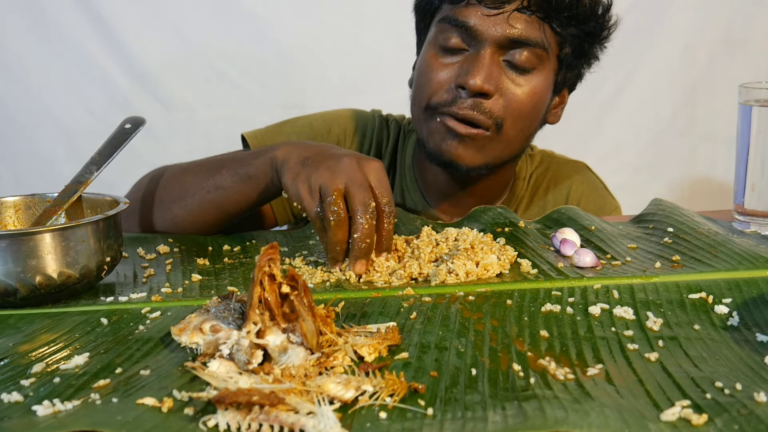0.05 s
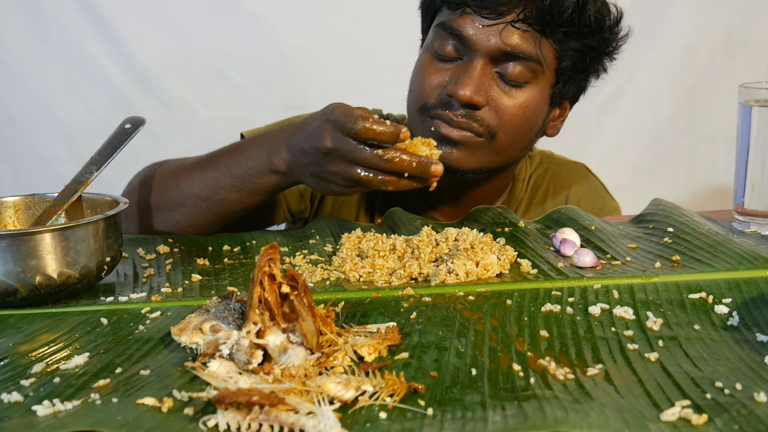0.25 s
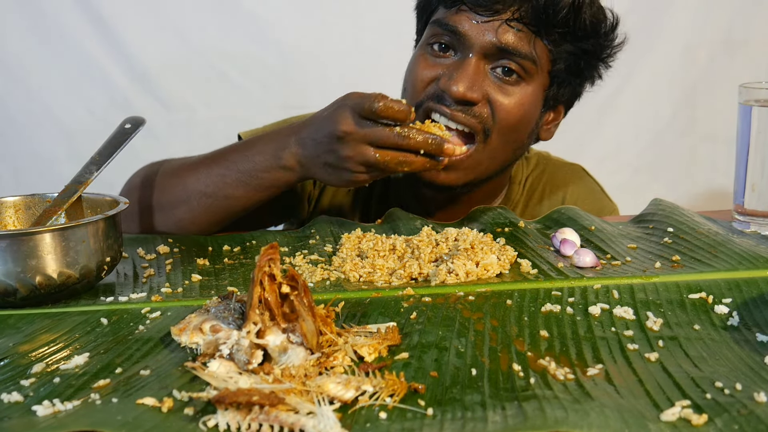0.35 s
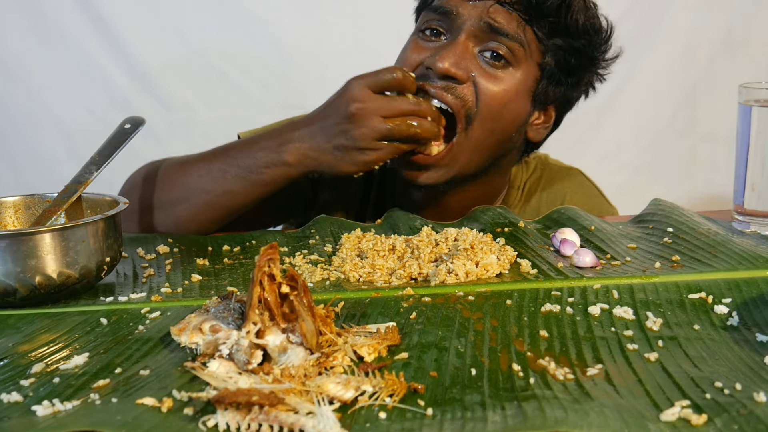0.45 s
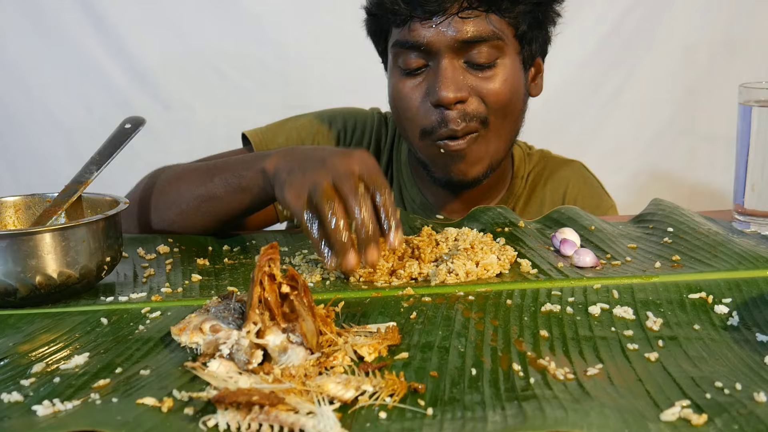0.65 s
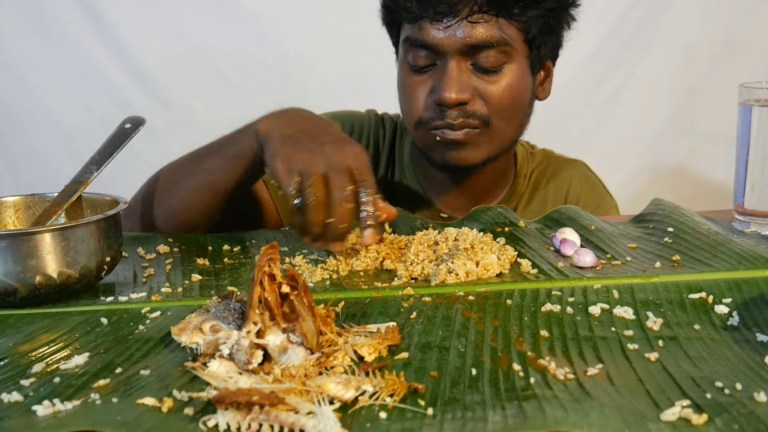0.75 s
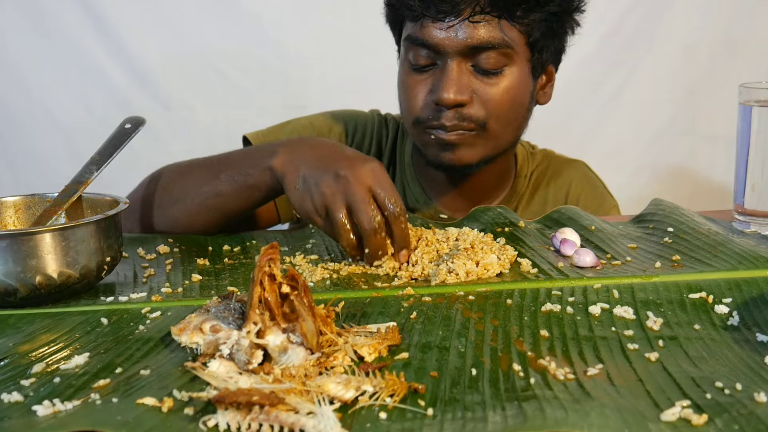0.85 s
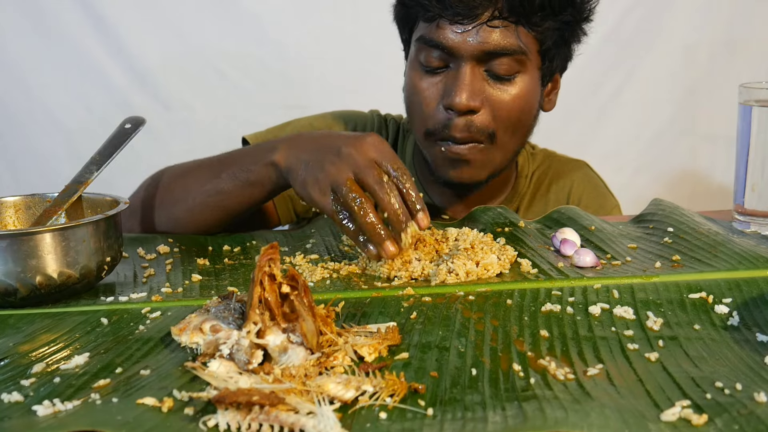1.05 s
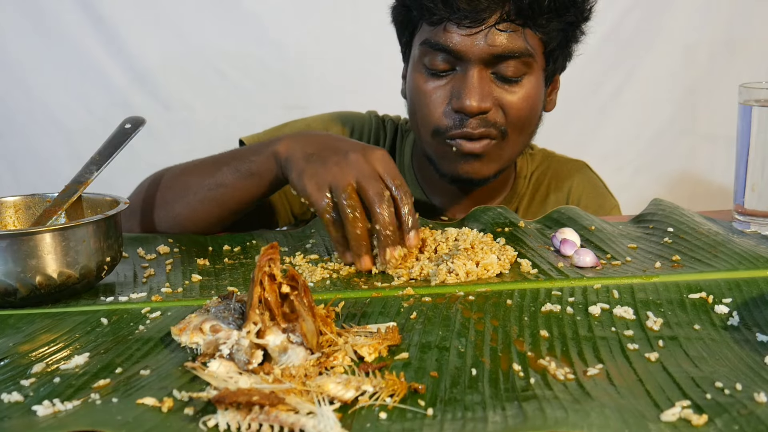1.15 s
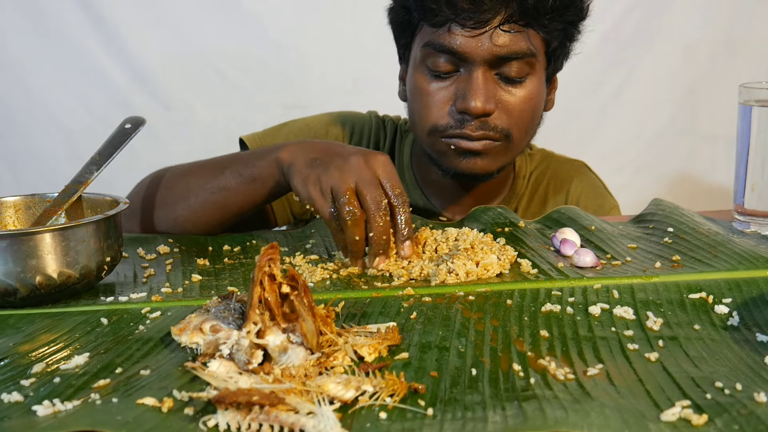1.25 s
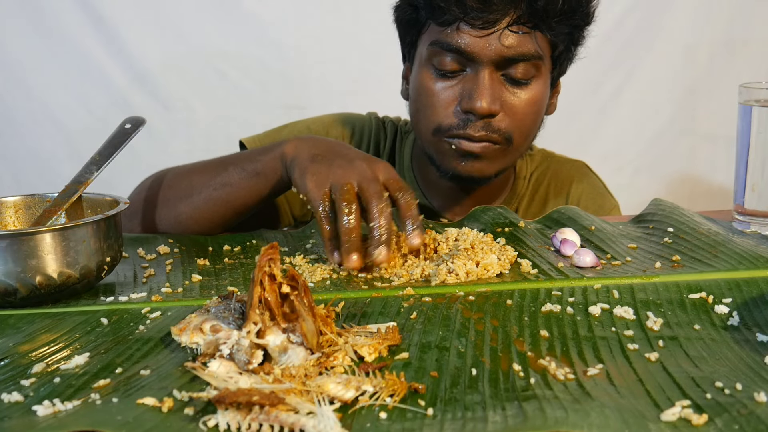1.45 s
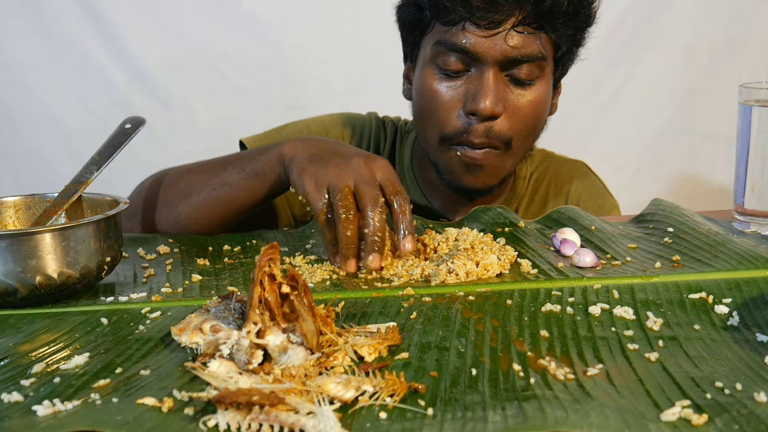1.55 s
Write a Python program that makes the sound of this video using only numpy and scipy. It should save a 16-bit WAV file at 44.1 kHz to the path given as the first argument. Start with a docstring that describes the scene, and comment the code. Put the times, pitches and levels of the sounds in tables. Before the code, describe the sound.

A hand kneads gravy-soaked rice up close: a dull thump and juicy squish come first, then short uneven squelches with popping bubbles, sticky snaps and faint crackle over low hush in a small dry room.

```python
"""A small room, heard up close: a bare hand mashes rice and wet gravy on a leaf.
Squelches run throughout, each a burst of tiny wet pops with small bubbles that ring and rise in pitch.
Soft low thumps, mostly early on, are damped resonances; air pockets ring in the same way, but higher.
Sticky films snap as short noise ticks; faint hisses and thin whistles near 6 kHz are bands of noise.
Beneath lie a faint wet crackle of sparse pops, a dull low rustle and a room hush of shaped noise."""
import sys
import numpy as np
from scipy import signal
from scipy.fft import rfft, irfft
from scipy.io import wavfile

SR = 44100
rng = np.random.default_rng(int(sys.argv[2]) if len(sys.argv) > 2 else 0)


def transcribe(u):
    """Save the signal u as a 16-bit wav file named by the first command-line argument.

    u: samples, shape (n,) or (channels, n), limited to [-1, 1]; the rate is SR.
    q: integer samples, one column per channel.
    """
    v = np.clip(np.atleast_2d(u).T, -1, 1)
    q = np.round(v * 32767).astype(np.int16)
    wavfile.write(sys.argv[1], SR, q)


N = 70560  # length of the scene [samples]
WIDTH = 0.33  # side signal relative to the centre, for the close sounds


def amp(db):
    """Decibels to linear gain."""
    return 10 ** (np.asarray(db) / 20)


def unit(x):
    """Scales a sound to an RMS of one."""
    return x / np.sqrt(np.mean(x ** 2) + 1e-20)


def read(points, hz):
    """A spectrum read on a log-frequency axis."""
    f, value = np.transpose(points)
    return np.interp(np.log(hz + 1), np.log(f), value)


def level_over_time(points):
    """A gain curve that moves in straight dB lines between (time, level) points."""
    return amp(np.interp(np.arange(N) / SR, *np.transpose(points)))


def add(mix, s, sound):
    """Adds a sound into the mix at a time in seconds, trimmed to the scene."""
    at = round(s * SR)
    sound = sound[..., max(-at, 0):]
    part = mix[:, max(at, 0):][:, :sound.shape[-1]]
    part += sound[..., :part.shape[1]]


def colour(x, points, size=4096):
    """Causal minimum-phase filter with the given spectrum."""
    log_gain = np.log(amp(read(points, abs(np.fft.fftfreq(size, 1 / SR)))))
    taps = np.fft.ifft(np.exp(signal.hilbert(log_gain).conj())).real[:size // 2]
    return signal.fftconvolve(x, taps[None], axes=1)[:, :x.shape[1]]


def spread(pair, width):
    """Left and right from a centre signal and a side signal."""
    centre, side = pair
    return np.array([centre + width * side, centre - width * side])


def level_burst(burst, length):
    """Gives each channel the energy of a unit-RMS sound of this length in seconds."""
    return burst * np.sqrt(length * SR) / np.linalg.norm(burst, axis=1, keepdims=True)


def pops(count, per_s, spread_db):
    """Two random trains of tiny pops of uneven size and either polarity."""
    size = amp(spread_db * np.minimum(rng.exponential(1, (2, count)), 4.5))
    polarity = rng.choice([-1., 1.], (2, count))
    return size * polarity * (rng.random((2, count)) < per_s / SR)


def ring(hz, peak_db, rise_s, decay_s, sag=0):
    """A damped resonance pushed softly into motion; sag lowers its pitch, in octaves per second."""
    t = np.arange(SR // 6) / SR
    swell = np.sin(np.pi / 2 * np.minimum(t / rise_s, 1)) ** 2
    fade = 1 / np.cosh(np.maximum(t - rise_s, 0) / decay_s * 1.49)
    turns = np.cumsum(hz * 2 ** (-sag * (t - rise_s))) / SR  # the given pitch falls at the peak
    return amp(peak_db) * swell * fade * np.sin(2 * np.pi * turns)


# presses of the hand: (start [s], length [s], body level [dB], squish level [dB], fizz level [dB],
# left minus right [dB])
SQUELCHES = [ (0.004, 0.034, -67, -48.5, -44, 0), (0.134, 0.02, -44.5, -57.5, -60, 2),
             (0.158, 0.0059, -43, -40.5, -42, 0), (0.205, 0.02, -33, -41.5, -61, 2.3),
             (0.294, 0.026, -25.5, -29, -39.5, 1.7), (0.369, 0.015, -22, -23.5, -37.5, 3.2),
             (0.385, 0.018, -33, -38, -43, -2), (0.459, 0.018, -42, -49.5, -51.5, 1.5),
             (0.546, 0.031, -36, -34.5, -47, 0.3), (0.595, .030, -50, -44, -72, 1),
             (0.637, 0.025, -35.5, -33, -45, 1.3), (0.664, 0.028, -70, -42.5, -47, -1),
             (0.794, .008, -57, -47, -53.5, 4), (0.804, 0.024, -37, -34.5, -39.5, 0.5),
             (0.83, 0.02, -46, -46, -50, -1), (0.898, 0.02, -36, -36.5, -43.5, .9),
             (0.944, 0.046, -54.5, -59, -58.5, 4), (1.059, 0.027, -33.5, -34, -42, -0.2),
             (1.151, 0.03, -37, -36, -45.5, 0.5), (1.182, 0.027, -55, -52, -45.5, .4),
             (1.225, 0.025, -44.5, -47, -63, 2), (1.338, 0.024, -38, -36, -47.5, 1),
             (1.416, .019, -36, -30, -44, 4.5), (1.437, 0.016, -44, -36.5, -42.5, -1.5),
             (1.492, 0.032, -51, -51.5, -70, 3), (1.592, 0.016, -32, -37.5, -46, 0.5)]
# tone of the dull body, wet squish and fine fizz: (frequency [Hz], relative level [dB])
BODY = [(40, -47), (110, -40.5), (165, -12), (225, -0.5), (335, 1), (450, -3.5), (700, -21.5), (1500, -51)]
SQUISH = [(200, -30), (430, -9), (570, 1.5), (680, -1.5), (800, -6.5), (1100, -8.5), (1700, -16.5),
          (2800, -21.5), (6000, -42)]
FIZZ = [(700, -32.5), (1700, -4.5), (2800, -1), (4000, 1), (5000, -2), (7200, -1.5), (10000, -7),
        (13000, -17), (15500, -62)]
POPS_PER_S, POP_SPREAD_DB, FIZZ_SPREAD_DB = 7000, 3.0, 1.5
RISE_S, LOW_RELEASE_S = 0.0021, 0.0057  # body and squish
FIZZ_RISE_S, FIZZ_RELEASE_S = 0.0029, 0.0032
BODY_LEAD_S, SQUISH_LEAD_S = 0.00385, 0.001925  # how far each runs ahead of the fizz
ONSET_S = 0.02  # room before the start for the swell to build


def squelches():
    """Each press is a swarm of pops heard as dull body, wet squish and fine fizz."""
    out = np.zeros((2, N))
    t = np.arange(SR // 8) / SR - ONSET_S
    for start, length, body_db, squish_db, fizz_db, pan_db in SQUELCHES:
        layers = (
            (BODY, body_db, BODY_LEAD_S, RISE_S, LOW_RELEASE_S, POP_SPREAD_DB),
            (SQUISH, squish_db, SQUISH_LEAD_S, RISE_S, LOW_RELEASE_S, POP_SPREAD_DB),
            (FIZZ, fizz_db, 0, FIZZ_RISE_S, FIZZ_RELEASE_S, FIZZ_SPREAD_DB))
        for spectrum, db, lead, rise, release, spread_db in layers:
            press = (1 + np.tanh(t / rise / 2)) * (1 - np.tanh((t - length) / release / 2))
            burst = colour(pops(len(t), POPS_PER_S, spread_db) * press, spectrum)
            burst = level_burst(burst, length)
            gains = amp([[db + pan_db / 2], [db - pan_db / 2]])
            add(out, start - ONSET_S - lead, spread(burst, WIDTH) * gains)
    return out


# air pockets that ring as they open: (start [s], pitch [Hz], peak level [dB], decay [s])
POCKETS = [(0.366, 426, -16, 0.004), (0.378, 357, -18, 0.0063), (0.387, 684, -31, 0.014),
           (0.547, 590, -36, 0.016), (0.618, 476, -39, 0.019), (0.638, 713, -33.5, 0.0067),
           (0.802, 648, -25.5, 0.0099), (0.815, 597, -28.5, .009), (0.895, 597, -26, 0.0078),
           (0.908, 631, -30, 0.012), (1.063, 609, -35, 0.0094), (1.339, 596, -31, 0.012)]
POCKET_RISE_S = 0.0042


def air_pockets():
    """A pocket of air rings at a steady pitch, dying away fast."""
    out = np.zeros((2, N))
    for start, hz, db, decay in POCKETS:
        add(out, start, ring(hz, db, POCKET_RISE_S, decay))
    return out


BUBBLE_LOW_HZ, BUBBLE_HIGH_HZ = 895, 4580
BUBBLE_CYCLES = 5.1  # cycles for the ring to fall to 1/e
BUBBLE_GLIDE = 0.065  # depth of the upward glide
BUBBLE_DB, BUBBLE_TILT_DB = -6, -0.5  # level against the squish [dB], change per octave up [dB]


def bubbles(count=8):
    """Each press bursts a few small gravy bubbles, which ring briefly and rise in pitch."""
    out = np.zeros((2, N))
    t = np.arange(SR // 25) / SR
    for start, length, _, squish_db, _, _ in SQUELCHES:
        for when, height, softness, side in rng.random((count, 4)):
            hz = BUBBLE_LOW_HZ * (BUBBLE_HIGH_HZ / BUBBLE_LOW_HZ) ** height
            age = t * hz / BUBBLE_CYCLES
            tone = np.sin(2 * np.pi * hz * t * (1 + BUBBLE_GLIDE * np.tanh(age / 2)))
            blip = tone * np.exp(-age) * np.minimum(t * hz, 1)  # fades in over one cycle
            tilt_db = BUBBLE_TILT_DB * np.log2(hz / BUBBLE_LOW_HZ)
            db = squish_db + BUBBLE_DB + tilt_db - 6 * softness
            pan = np.sqrt([[.5 + side], [1.5 - side]])
            add(out, start + when * length, amp(db) * blip * pan)
    return out


# soft low thumps: (start [s], pitch [Hz], peak level [dB], rise [s], decay [s])
THUMPS = [ (0.127, 231, -32.5, 0.018, 0.011), (0.193, 226, -19, 0.012, 0.0073),
          (0.227, 252, -27, 0.0066, 0.0068), (0.244, 240, -33.5, 0.0089, 0.0074),
          (0.288, 236.2, -4, 0.015, 0.0063), (0.324, 255, -25.5, 0.0057, 0.011),
          (0.367, 250.7, -16.5, 0.014, 0.0048), (0.730, 134, -42, 0.017, .014),
          (0.838, 131, -41, 0.011, 0.0094), (0.912, 342, -37, 0.011, 0.011),
          (1.086, 251, -32.5, 0.0094, 0.012), (1.412, 225, -28.5, 0.015, 0.013),
          (1.498, 326, -36, 0.0065, 0.0092)]
THUMP_SAG_OCT_PER_S = 2.5


def thumps():
    """Soft, heavily damped low knocks whose pitch sags as the load settles."""
    out = np.zeros((2, N))
    for start, hz, db, rise, decay in THUMPS:
        add(out, start, ring(hz, db, rise, decay, THUMP_SAG_OCT_PER_S))
    return out


# sticky films snapping: (time [s], pitch [Hz], level [dB])
SNAPS = [(0.1706, 6630, -24.5), (0.537, 3720, -39), (0.670, 3960, -40.5), (0.686, 3300, -45),
         (1.074, 7700, -33), (1.146, 10100, -42), (1.1785, 11400, -38), (1.198, 10200, -35),
         (1.441, 3860, -34)]
SNAP_DECAY_S = 0.0018
SNAP_OCTAVES = 0.31  # distance from the pitch where the peak is 6 dB down
SNAP_SKIRT_DB, SNAP_SKIRT_FALL_DB = -8.5, 9.5  # broad skirt under the peak, fall per octave squared


def snaps():
    """A film of gravy breaks with a short bright tick of noise around one pitch."""
    out = np.zeros((2, N))
    t = np.arange(SR // 30) / SR
    f = np.geomspace(100, 20000, 60)
    for start, hz, db in SNAPS:
        octaves = np.log2(f / hz)
        peak = -6 * (octaves / SNAP_OCTAVES) ** 2
        skirt = SNAP_SKIRT_DB - SNAP_SKIRT_FALL_DB * octaves ** 2
        shape = np.maximum(peak, skirt).clip(-70, 0)
        tick = rng.standard_normal((2, len(t))) * np.exp(-t / SNAP_DECAY_S)
        tick = level_burst(colour(tick, np.c_[f, shape]), SNAP_DECAY_S)
        add(out, start, amp(db) * spread(tick, WIDTH))
    return out


# faint hisses, and faint thin whistles near 6 kHz:
# (start [s], length [s], pitch [Hz], width [Hz], level [dB])
HISSES_AND_WHISTLES = [(0.319, .045, 6160, 700, -54), (0.43, 0.029, 4700, 1810, -48.5),
                       (0.576, 0.019, 4130, 1000, -52.5), (0.945, 0.021, 4640, 2000, -54),
                       (0.673, .105, 5950, 130, -61), (0.831, 0.062, 6030, 130, -60),
                       (0.974, 0.081, 5960, 130, -59.5)]


def hisses_and_whistles():
    """Short bands of noise: wide ones hiss, and the narrowest are almost whistles."""
    out = np.zeros((2, N))
    size = 8192
    f = np.fft.rfftfreq(size, 1 / SR)
    for start, length, hz, width, db in HISSES_AND_WHISTLES:
        band = 1 / (1 + (2 * (f - hz) / width) ** 4)
        noise = unit(irfft(rfft(rng.standard_normal((2, size))) * band))
        swell = np.sqrt(np.hanning(min(round(length * SR), size)))
        add(out, start, amp(db) * spread(noise[:, :len(swell)], WIDTH) * swell)
    return out


# level of the wet crackle: (time [s], level [dB])
CRACKLE_DB = [(0, -48), (.07, -54.5), (.15, -53), (.19, -52), (.24, -73), (.28, -64), (.33, -49.5),
              (.42, -54), (.47, -65), (.52, -57), (.70, -54), (.77, -59), (.94, -54), (1.02, -66),
              (1.25, -60), (1.3, -61.5), (1.6, -57)]
CRACKLES_PER_S, CRACKLE_SPREAD_DB = 1600, 2.5
FLOOR_WIDTH = 0.67  # side against centre, for crackle and hush


def crackle():
    """Wet rice crackles faintly: sparse pops with the tone of the fizz."""
    grains = colour(pops(N, CRACKLES_PER_S, CRACKLE_SPREAD_DB), FIZZ)
    return level_over_time(CRACKLE_DB) * unit(spread(grains, FLOOR_WIDTH))


# tone of the dull low rustle: (frequency [Hz], relative level [dB])
RUSTLE = [(30, -37), (80, -41), (130, -2), (180, -7.5), (300, -11.5), (800, -74)]
# level of the rustle: (time [s], level [dB])
RUSTLE_DB = [(0, -76), (.1, -73), (.135, -44), (.18, -53.5), (.28, -46), (.33, -40), (.4, -71), (.68, -63),
             (.72, -48), (.79, -57), (.85, -51), (.96, -64), (1.6, -72)]


def rustle():
    """A dull low rustle: dark noise that swells and dips."""
    noise = colour(rng.standard_normal((2, N)), RUSTLE)
    return level_over_time(RUSTLE_DB) * unit(spread(noise, WIDTH))


# tone of the room hush: (frequency [Hz], relative level [dB])
HUSH = [(20, -25.5), (60, -11.5), (130, -5.5), (320, 3.5), (440, -0.5), (650, -5.5), (850, -5), (1500, -12),
        (4000, -18), (8000, -22), (12000, -24), (15500, -28.5)]
HUSH_DB = -49.5


def hush():
    """Steady room hush: wide noise, strongest in the low mids."""
    noise = colour(rng.standard_normal((2, N)), HUSH)
    return amp(HUSH_DB) * unit(spread(noise, FLOOR_WIDTH))


# how long the room rings: (frequency [Hz], time to fall 60 dB [s])
ROOM_T60 = [(150, 0.11), (600, 0.17), (3000, 0.13), (12000, 0.085)]
ROOM_DB, THUMP_ROOM_DB = -12, -28.5  # send of the wet sounds and of the thumps


def room(x):
    """A short diffuse tail of noise, decaying at its own rate in each band, different at each ear."""
    hz, t, bands = signal.stft(rng.standard_normal((2, SR // 2)), SR, nperseg=256)
    decay = amp(-60 * t / read(ROOM_T60, hz)[:, None])
    tail = signal.istft(bands * decay, SR, nperseg=256)[1]
    tail *= np.minimum(np.arange(tail.shape[1]) / SR / 0.0034, 1)  # builds up over 3.4 ms
    return signal.fftconvolve(x, tail / np.linalg.norm(tail[0]), axes=1)[:, :N]


def scene():
    """Close wet sounds and thumps, their room tail, and the quiet bed beneath."""
    wet = squelches() + air_pockets() + bubbles() + snaps() + hisses_and_whistles()
    low = thumps()
    tail = room(amp(ROOM_DB) * wet + amp(THUMP_ROOM_DB) * low)
    return wet + low + tail + crackle() + rustle() + hush()


CUT_HZ = 15400


def record(dry):
    """The recorder's band limit: a steep low-pass."""
    low_pass = signal.firwin(255, CUT_HZ, window=("kaiser", 9), fs=SR)
    return signal.oaconvolve(dry, low_pass[None], "same")


dry = scene()
out = record(dry)
transcribe(out)
```